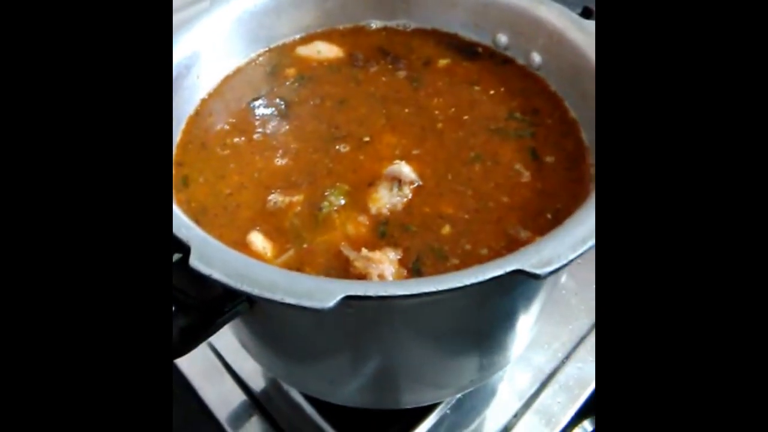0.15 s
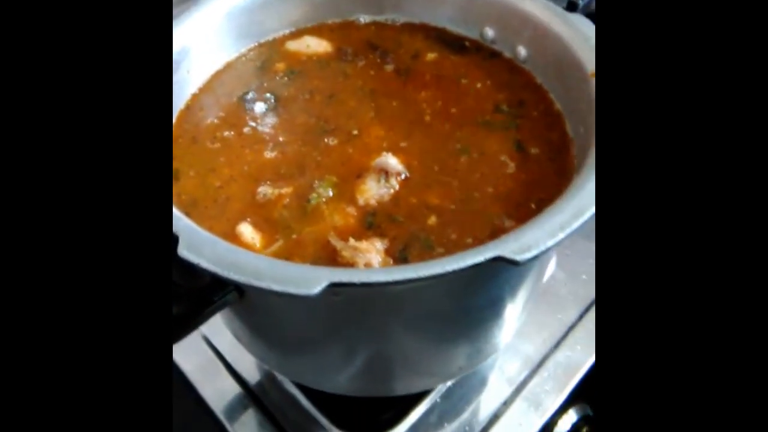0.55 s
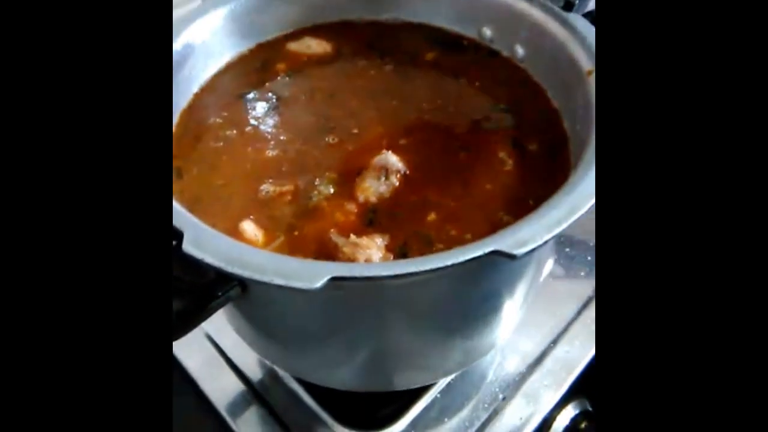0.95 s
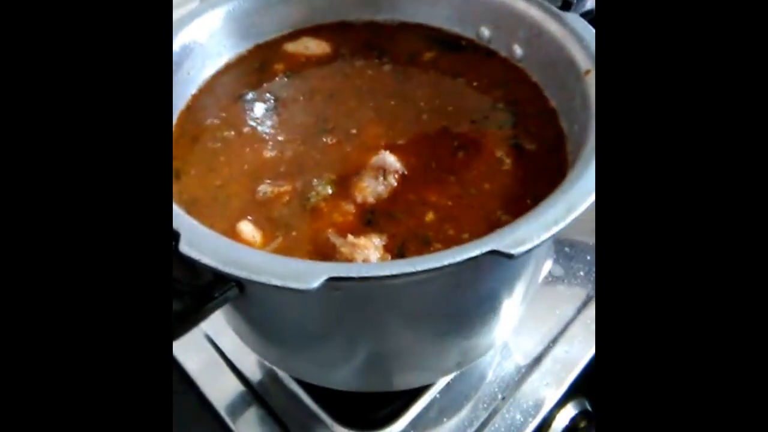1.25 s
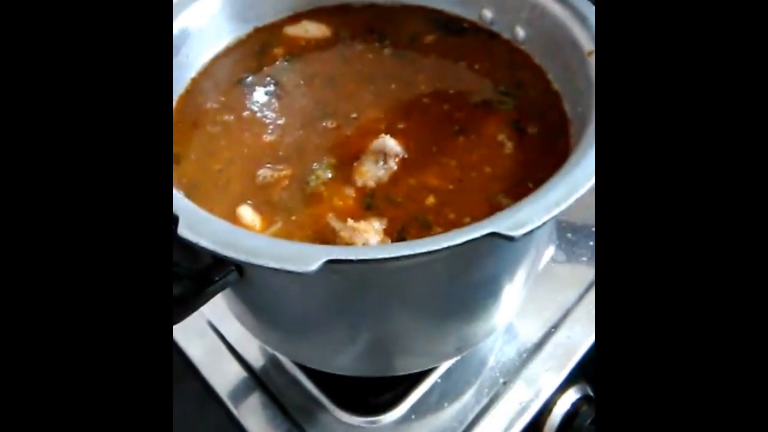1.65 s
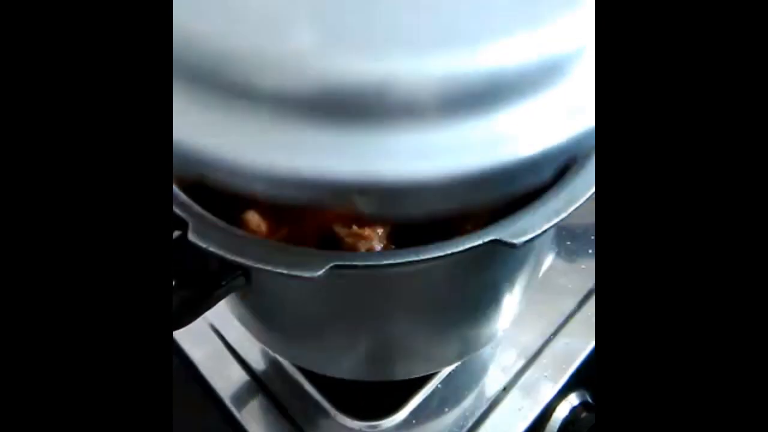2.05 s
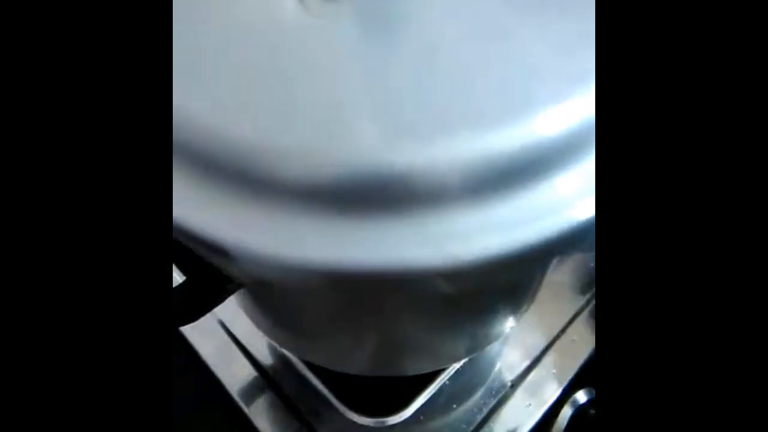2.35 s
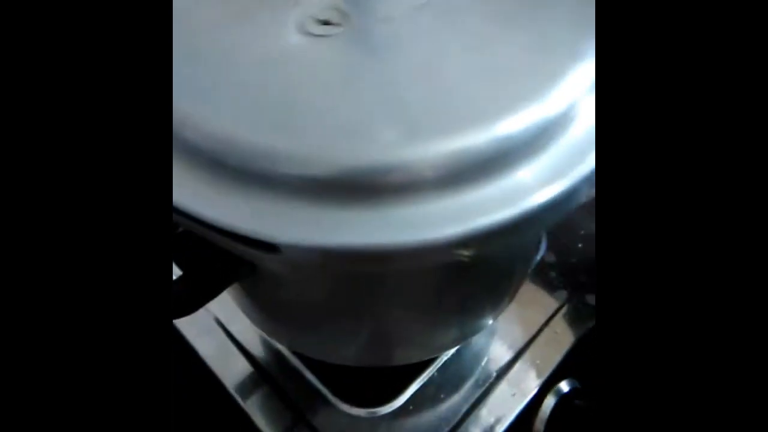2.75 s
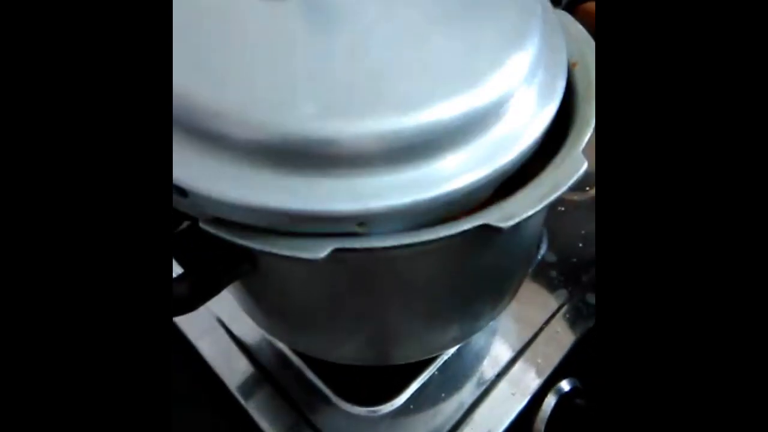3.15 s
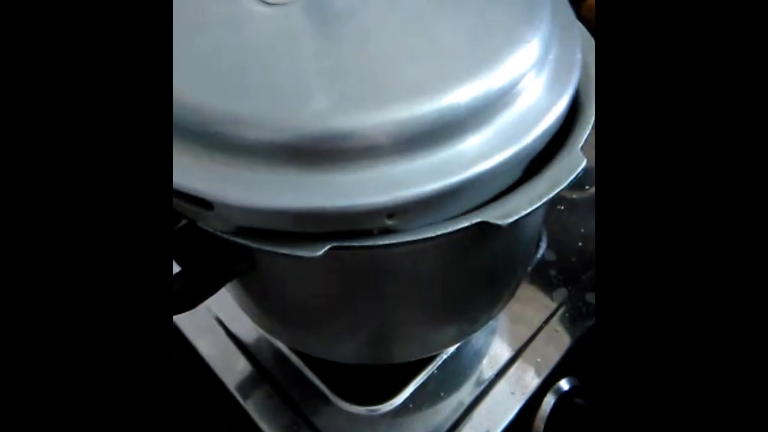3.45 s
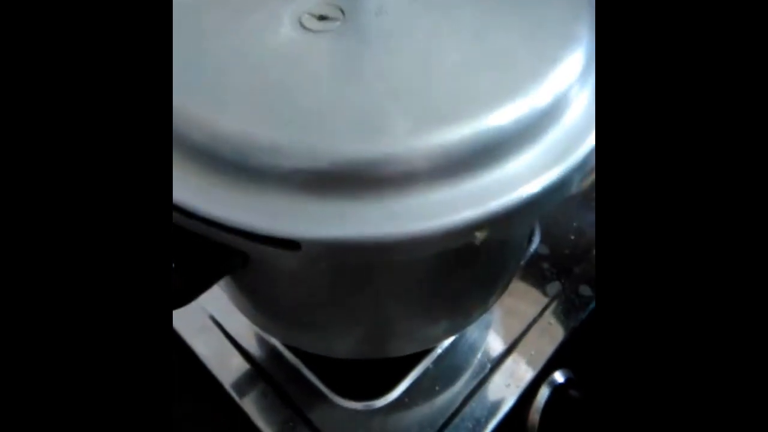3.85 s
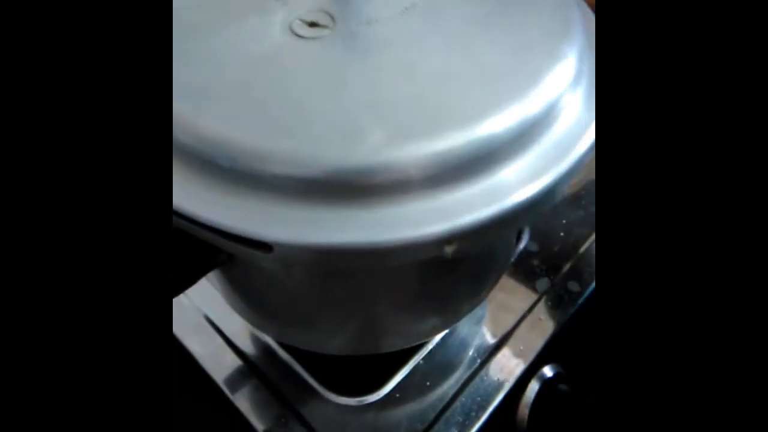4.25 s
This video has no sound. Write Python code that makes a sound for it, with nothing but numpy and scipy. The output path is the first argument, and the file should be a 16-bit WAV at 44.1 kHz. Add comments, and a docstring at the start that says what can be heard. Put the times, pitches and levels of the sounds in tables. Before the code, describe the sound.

A few distant utensil clacks, near-quiet with faint hum, then a heavy pressure cooker lid clangs, scrapes, wobbles and locks into place.

```python
"""Utensils knock a little way off in a hard-walled kitchen, over mains hum and room air, with a soft scuff
between the knocks. Faint tinks of warm metal come and go, and the hollow under a steel lid booms softly as it
comes over a pressure cooker of soup; a thin stove hiss joins in. Close by, the lid then clanks on the rim,
grinds round it, wobbles on its gasket, settles and snaps into its lugs.
Shaped noise makes the dense rings, air and hiss; sine waves make the lid's long rings and the hum."""
import sys
import numpy as np
from scipy import signal
from scipy.fft import rfft, irfft, next_fast_len
from scipy.io import wavfile
from scipy.ndimage import map_coordinates

SR = 44100
rng = np.random.default_rng(int(sys.argv[2]) if len(sys.argv) > 2 else 0)


def wav_record(signal):
    """Record a signal, one row per channel, as 16-bit PCM in the file named by sys.argv[1]."""
    frames = np.transpose(np.atleast_2d(signal))
    bounded = np.clip(frames, -1, 1)
    # unit amplitude maps onto the largest positive 16-bit level
    quanta = np.round(bounded * 32767).astype(np.int16)
    wavfile.write(sys.argv[1], SR, quanta)


N = 194201  # length in samples
RING = np.arange(3 * SR // 4) / SR  # time within one ring, s

# In the tables, t60 is the time to fall by 60 dB. Levels are relative unless marked rms.
# Bass and treble are tilts, which tilt() weights by frequency.

# the lid's edge strikes the rim: t/s, level/dB, treble/dB, pot thump/dB
LID_CONTACTS = [(2.950, -8, -4, -5.5), (3.071, -18.5, -2.5, -1.5), (3.296, -21.5, -2.5, -3),
                (3.309, -24, 3.5, -4), (3.320, -17.5, 1.5, -25), (3.402, -16, 2, -3), (3.435, -16, 4, -1),
                (3.559, -29.5, -20, 10), (3.596, -12.5, 3.5, 3.5), (3.634, -25, 18, 7.5),
                (3.717, -27.5, 7, 12), (3.757, -31, -16, -2), (3.962, -31.5, -5, 11.5),
                (4.197, -26.5, -7, 8), (4.250, -9.5, 4.5, -13), (4.385, -15, -1, -6)]
# dense crowd of modes in lid and pot: f/Hz, level/dB per Hz
SHELL_COLOUR = [(30, -48), (100, -18), (170, -17), (240, -11), (370, -10.5), (650, -5), (950, -11),
                (1800, -7.5), (2800, -18), (4300, -14.5), (5650, -18), (7500, -19.5), (10000, -15),
                (14000, -39)]
# where those modes bunch or thin out: f/Hz, width/Hz, lift/dB
MODE_CLUSTERS = [(482, 54, 6), (1187, 113, 7.5), (2024, 115, 6), (2353, 10, 14), (2450, 56, -1.5),
                 (3600, 200, 4), (3830, 107, 12), (4430, 100, 5.5), (4930, 200, 7.5), (5810, 46, 2),
                 (5720, 72, -11.5), (6130, 28, 12), (6654, 280, 12.5), (7450, 40, 13.5), (8000, 24, 16),
                 (8570, 480, 9), (9320, 160, 7), (11770, 76, 6.5), (11980, 43, 14.5)]
# single lid modes that ring out: f/Hz, level/dB, t60/s
LID_MODES = [(231.7, -2.5, 1.05), (301.7, -6, 2.25), (504.2, 2.5, 0.2), (523, -2, 0.31), (676, -13, .6),
             (740, 3, 0.32), (1134, -3, 0.38), (1170, -27, 0.41), (1793, -1, 0.56), (1960, -11, 0.36),
             (2355, -5.5, 0.2), (3670, 8.5, 0.081), (3630, -27, .45), (3880, -2, 0.22), (4170, -5, 0.51),
             (4520, -3, 0.27), (5030, -11, 0.36), (7140, -11, 0.3), (6670, -6, 0.33), (7860, -10.5, 0.95),
             (8430, -7.5, 0.3)]
# the well-damped pot's thump: f/Hz, level/dB per Hz
POT_COLOUR = [(40, -11), (100, -31), (220, -12), (400, -14.5), (510, 12.5), (620, -1), (850, -5),
              (1200, -11), (2500, -28)]
# pushes that grind the lid round on the rim: t at full force/s, held/s, level/dB, treble/dB
GRIND_PUSHES = [(3.335, 0.012, -19, 3.5), (3.443, 0.017, -12, 2.5), (3.63, 0.049, -15, 4.5),
                (4.277, 0.07, -16, 2)]
# light rubbing between pushes: t/s, held/s, level/dB
LIGHT_RUB = (3.4, 0.51, -42)
# spells when the loose lid wobbles on its gasket: from t/s, to t/s, level/dB
GASKET_WOBBLES = [(3.168, 3.25, -44.5), (3.795, 3.92, -41.5), (4.005, 4.17, -44)]
# utensils put down further off: t/s, level/dB, bass/dB, treble/dB, low f/Hz, high f/Hz, decay factor
UTENSIL_KNOCKS = [(0.000, -22, -10, -0.5, 490, 2236, 0.62), (0.035, -31.5, -14.5, -8.5, 1550, 3100, 0.91),
                  (0.296, -55, 3, -12, 520, 1185, 0.5), (0.536, -32.5, -9, -18.5, 656, 1800, 0.66),
                  (0.567, -11, 3.5, 4.5, 723, 1240, 0.77), (0.645, -27, 7.5, 3, 277, 710, 0.68),
                  (0.680, -31.5, 10.5, 9.5, 784, 4500, 0.65), (1.664, -34, -3, 9, 855, 4120, 0.6),
                  (1.705, -43, 3, 17.5, 796, 1975, 0.45)]
# shared tone of the utensils: f/Hz, level/dB per Hz
UTENSIL_COLOUR = [(50, -33.5), (150, -34), (220, -24), (290, -3.5), (390, -16.5), (600, -10.5), (800, -6),
                  (1000, -9.5), (1500, -8), (2000, -6.5), (2700, -17.5), (4300, -20), (5700, -21.5),
                  (9500, -22.5), (14000, -37.5)]
# a soft scuff: t/s, held/s, level/dB rms
SOFT_SCUFF = (1.029, 0.032, -42)
# tone of the scuff: f/Hz, level/dB per Hz
SCUFF_TONE = [(300, -46), (880, -1), (1200, -23), (1850, 5), (2200, -55), (2550, -18), (2950, 4),
              (4100, -2.5), (4650, -14), (5300, -1.5), (7000, -3), (9500, -1), (11000, -18), (14000, -25.5)]
# faint tinks of warm metal: t/s, f/Hz, level/dB
METAL_TINKS = [(0.27, 1160, -54.5), (1.241, 1162, -61), (1.576, 3195, -54.5), (1.751, 4040, -55),
               (1.88, 1296, -65.5), (2.12, 940, -59), (2.21, 1293, -66.5), (2.62, 9810, -55),
               (2.875, 2047, -63)]
# swells of the hollow under the hovering lid: t at the top/s, level/dB, half-width/s
HOLLOW_SWELLS = [(1.62, -50, 0.05), (1.80, -45.5, 0.032), (2.11, -50, 0.089), (2.31, -44, 0.17),
                 (2.72, -51.5, 0.07), (2.86, -50.5, 0.058)]
# resonances of that hollow: f/Hz, width/Hz, level/dB
HOLLOW_RESONANCES = [(179.6, 3.85, -1), (232, 14, -16.5), (687, 43, -20.5)]
# mains hum: f/Hz, level/dB rms
MAINS_HUM = [(60, -67), (120.3, -62), (181, -81.5), (241.5, -73.5), (302, -70)]
# tone of the room air: f/Hz, level/dB per Hz
AIR_COLOUR = [(25, -39.5), (42, -19), (60, -21), (100, -9.5), (144, -26.5), (180, -14.5), (250, -24.5),
              (300, -28.5), (420, -24), (560, -26), (703, -18), (830, -32.5), (1500, -34.5), (3000, -40.5),
              (9000, -43), (14000, -48)]
# decay of the kitchen, before each sound's own stretch: f/Hz, t60/s
KITCHEN_DECAY = [(100, 0.59), (300, 0.89), (1000, 0.65), (2800, 0.56), (7000, 0.47), (13000, 0.41)]
# likeness of left and right, 1 alike to -1 opposite: f/Hz, likeness
LEFT_RIGHT_LIKENESS = [(60, .6), (280, .8), (750, .5), (1150, -.1), (1900, -.5), (3000, 0), (3800, .3),
                       (5200, -.1), (6600, .5), (13000, .35)]
# left level above right, for the lid, pot and room air: f/Hz, left-right/dB
LID_LEAN = [(60, 3), (200, 6), (600, -0.5), (4000, 1.5), (6700, -1.5), (8500, 5), (13000, 4)]
# the same for the utensils, scuff, tinks and hiss: f/Hz, left-right/dB
DISTANT_LEAN = [(100, 1), (400, 0.5), (1200, 2.5), (4000, 4.5), (7000, -1), (9000, 8), (13000, 8)]
# the same for the hollow: f/Hz, left-right/dB
HOLLOW_SIDE_LEAN = [(180, 16.5), (700, -10)]

CONTACT_RISE_S, KNOCK_RISE_S = 0.003, 0.0055
FIRM_DB, BASS_PER_DB = -17, 1.62  # blows lighter than firm ring darker, harder ones thinner
BASS_LIMIT_DB = 6
PUSH_DB_PER_S, EASE_DB_PER_S = 348, 419  # how fast a push builds and lets go
RUB_FADE_DB_PER_S = 84
WOBBLE_GAP_S, WOBBLE_SCATTER_S = 0.047, 0.0069
SCUFF_RISE_DB_PER_S, SCUFF_FALL_DB_PER_S = 896, 232
TOP_HZ = 14100  # upper band limit


def clanks():
    """The lid lands, shifts and seats; the harder the blow, the thinner its ring."""
    track = np.zeros((2, N))
    for s, db, treble_db, thump_db in LID_CONTACTS:
        bass_db = min(BASS_PER_DB * (FIRM_DB - db), BASS_LIMIT_DB)
        add(track, s, amp(db) * blow(bass_db, treble_db, thump_db, CONTACT_RISE_S))
    return track


def blow(bass_db, treble_db, thump_db, rise, thump_t60=0.14, echo_db=-13):
    """A landing rings the lid and thumps the full, well-damped pot, and the room answers."""
    def pot():
        return noise(lambda hz: along(POT_COLOUR, hz), LID_LEAN, len(RING))

    direct = pot() * amp(-60 * RING / thump_t60)
    echo = amp(echo_db) * fade(pot(), stretch=0.96)
    thump = (direct + echo) * attack(rise, crack=0)
    return lid_ring(bass_db, treble_db, rise) + amp(thump_db) * thump


def lid_ring(bass_db, treble_db, rise, modes_db=-15):
    """One blow on the lid: dense shell modes in the room, and single modes at new strengths."""
    def colour(hz):
        clusters = sum(bump(hz, *cluster) for cluster in MODE_CLUSTERS)
        return along(SHELL_COLOUR, hz) + ripple(hz, 8, 85) + clusters

    def touch(hz):
        return tilt(hz, bass_db, treble_db)

    sound = fade(noise(colour, LID_LEAN, len(RING), touch), stretch=0.83)
    for hz, db, t60 in LID_MODES:
        level = amp(modes_db + db + touch(hz) + 2 * rng.standard_normal())
        # left and right are set apart in phase
        phase = 2 * np.pi * rng.random() + half_angle(hz) * np.array([[-1], [1]])
        sound = sound + level * amp(-60 * RING / t60) * np.sin(2 * np.pi * hz * RING + phase)
    return sound * attack(rise, crack=0.29)


def grinding():
    """A few firm pushes turn the lid, with light rubbing between them."""
    pushes = sum(stroke(s, held, db, PUSH_DB_PER_S, EASE_DB_PER_S) for s, held, db, _ in GRIND_PUSHES)
    rub = stroke(*LIGHT_RUB, PUSH_DB_PER_S, RUB_FADE_DB_PER_S)
    times, _, _, treble_db = np.transpose(GRIND_PUSHES)
    return scrape(pushes + rub, np.interp(np.arange(N) / SR, times, treble_db))


def scrape(force, treble_db, slip_rate=170, spread_db=4, bass_db=-5):
    """The rim sticks and slips unevenly; each slip is a tiny blow, and the ring changes as contact moves."""
    happens = rng.random(N) < slip_rate / SR  # slip_rate is the average number per second
    strength = amp(spread_db * rng.standard_normal(N))
    slips = unit(happens * strength * rng.choice([-1, 1], N)) * force
    track, step = np.zeros((2, N)), SR // 10
    first = int(LID_CONTACTS[0][0] * SR) // step * step
    # a fresh ring for every tenth of a second
    for start in range(first, N, step):
        ring = unit(lid_ring(bass_db, treble_db[start], rise=0.00015)) / np.sqrt(len(RING))
        add(track, start / SR, signal.fftconvolve(slips[None, start:start + step], ring, axes=1))
    return track


def wobbling(spread_db=2, bass_db=10, treble_db=-15, thump_db=12):
    """Dull, nearly regular bumps as the lid rocks on its gasket."""
    track = np.zeros((2, N))
    for start, end, db in GASKET_WOBBLES:
        for s in np.arange(start, end, WOBBLE_GAP_S):
            late, strong = rng.standard_normal(2)
            level = amp(db + spread_db * strong)
            sound = blow(bass_db, treble_db, thump_db, rise=0.0026)
            add(track, s + WOBBLE_SCATTER_S * late, level * sound)
    return track


def utensils(low_db=6, high_db=7):
    """Duller knocks, heard mostly through the room, each with two resonances of its own."""
    track = np.zeros((2, N))
    for s, db, bass_db, treble_db, low_hz, high_hz, stretch in UTENSIL_KNOCKS:
        def colour(hz):
            rings = bump(hz, low_hz, 100, low_db) + bump(hz, high_hz, 0.023 * high_hz, high_db)
            return along(UTENSIL_COLOUR, hz) + ripple(hz, 7.5, 90) + rings

        def touch(hz):
            return tilt(hz, bass_db, treble_db)

        tail = fade(noise(colour, DISTANT_LEAN, len(RING), touch), stretch)
        add(track, s, amp(db) * tail * attack(KNOCK_RISE_S, crack=0.26))
    return track


def handling(tink_width_hz=30, tink_stretch=0.85):
    """A short soft scuff of shaped noise, and a few faint narrow-band tinks blurred by the room."""
    scuff = noise(lambda hz: along(SCUFF_TONE, hz) + ripple(hz, 7, 130), DISTANT_LEAN, N)
    track = stroke(*SOFT_SCUFF, SCUFF_RISE_DB_PER_S, SCUFF_FALL_DB_PER_S) * scuff
    for s, pitch_hz, db in METAL_TINKS:
        def colour(hz):
            return -20 * np.log10(1 + ((hz - pitch_hz) / tink_width_hz) ** 2)

        tink = fade(noise(colour, DISTANT_LEAN, len(RING)), tink_stretch)
        add(track, s, amp(db) * tink * attack(rise=0.0017, crack=0))
    return track


def hollow(level_db=-5.0):
    """The air between lid and soup booms softly at a few resonances as the lid comes over."""
    def colour(hz):
        peaks = sum(amp(db) / (1 + ((hz - centre) / width) ** 2) for centre, width, db in HOLLOW_RESONANCES)
        return 20 * np.log10(1e-9 + peaks)

    t = np.arange(N) / SR
    swells = sum(amp(db) * np.exp(-((t - s) / width) ** 2) for s, db, width in HOLLOW_SWELLS)
    return amp(level_db) * swells * noise(colour, HOLLOW_SIDE_LEAN, N)


def stove(air_db=-61, hiss_db=-76):
    """Steady room air and mains hum, joined at 1.85 s by a thin high hiss from the burner."""
    t = np.arange(N) / SR
    hum = sum(np.sqrt(2) * amp(db) * np.sin(2 * np.pi * (hz * t + rng.random())) for hz, db in MAINS_HUM)
    jet_colour = [(9000, -35), (11000, -11), (11500, 1), (12200, -14), (13500, -25)]  # f/Hz, level/dB per Hz
    jet = noise(lambda hz: along(jet_colour, hz), DISTANT_LEAN, N)
    # t/s, level/dB on top of hiss_db
    hiss = amp(hiss_db) * curve([(1.85, -9), (2.1, 7), (2.9, 4.5)]) * jet
    air = amp(air_db) * noise(lambda hz: along(AIR_COLOUR, hz), LID_LEAN, N)
    return air + hum + hiss


def stroke(start, held, db, rise_db_per_s, fall_db_per_s):
    """Gain per sample of a movement that builds, holds and lets go."""
    t = np.arange(N) / SR - start
    build = abs(rise_db_per_s) * np.maximum(-t, 0)
    release = abs(fall_db_per_s) * np.maximum(t - held, 0)
    return amp(db - build - release)


def attack(rise, crack):
    """Contact builds over rise seconds; the direct sound stands above the tail for a moment."""
    return (1 - np.exp(-RING / max(rise, 1e-4))) * (1 + crack * np.exp(-RING / 0.014))


def tilt(hz, bass_db, treble_db):
    """Tilts a sound's bass and treble by the given dB, weighted by frequency."""
    bass = bass_db * along([(400, 0.84), (1100, 0)], hz)
    treble = treble_db * along([(900, 0.0026), (2000, 0.0), (3600, 0.88)], hz)
    return bass + treble


def bump(hz, centre_hz, width_hz, db):
    """A resonance as a hump in dB, or a dip where db is negative."""
    return db * np.exp(-((hz - centre_hz) / width_hz) ** 2)


def ripple(hz, depth_db, spacing_hz):
    """Random smooth lifts and dips in dB: some resonances are favoured and others missed."""
    knots = rng.standard_normal(1024)
    return depth_db * np.tanh(map_coordinates(knots, [hz / spacing_hz], mode="wrap"))


def fade(x, stretch):
    """Each frequency dies at the pace of the kitchen; some resonances linger and others die early."""
    hz, t, z = signal.stft(x, SR, nperseg=512)
    linger = amp(ripple(hz, 1.8, 100))
    t60 = stretch * along(KITCHEN_DECAY, hz) * linger
    return signal.istft(z * amp(-60 * t / t60[:, None]), SR, nperseg=512)[1][:, :x.shape[1]]


def noise(colour, lean, size, touch=lambda hz: 0):
    """Stereo noise scaled to a common level with a dB colour, then tilted by touch and leaned to a side."""
    hz = np.fft.rfftfreq(size, 1 / SR)
    angle = half_angle(hz)
    # a shared part and an opposite part set how alike the two sides are
    mid, side = np.exp(2j * np.pi * rng.random((2, len(hz)))) * [np.cos(angle), np.sin(angle)]
    pan = amp(along(lean, hz) / 2)
    gain = unit(amp(colour(hz))) * amp(touch(hz)) * np.sqrt(size)
    return irfft(np.array([(mid + side) * pan, (mid - side) / pan]) * gain, size)


def half_angle(hz):
    """Half the phase angle between the two microphones."""
    return np.arccos(np.clip(along(LEFT_RIGHT_LIKENESS, hz), -1, 1)) / 2


def radiated(x, corner_hz):
    """Small metal things push little air at low frequencies."""
    return signal.sosfilt(signal.butter(2, corner_hz, "highpass", fs=SR, output="sos"), x)


def amp(db):
    """Decibels to gain."""
    return np.exp(np.asarray(db) * np.log(10) / 20)


def unit(x):
    """Scaled to rms 1."""
    return x / np.sqrt(np.mean(x ** 2) + 1e-20)


def along(points, hz):
    """Points of f/Hz and value, read on a log axis."""
    f, v = np.transpose(points)
    return np.interp(np.log(hz + 1), np.log(f + 1), v)


def curve(rows):
    """Rows of t/s and level/dB as a gain per sample, near silent before the first row."""
    s, db = np.transpose(rows)
    return amp(np.interp(np.arange(N) / SR, s, db, left=-120))


def add(track, s, sound):
    """Mix a sound into the track at time s."""
    start = max(0, round(s * SR))
    track[:, start:start + sound.shape[1]] += sound[:, :N - start]


def scene():
    """Everything at the two microphones."""
    metal = clanks() + grinding() + wobbling() + utensils()
    background = handling() + hollow() + stove()
    return radiated(metal, corner_hz=55) + background


def record(dry):
    """The recorder rounds off peaks near full scale and cuts steeply above its band limit."""
    rounded = dry / (1 + dry ** 6) ** (1 / 6)
    size = next_fast_len(N + SR // 2)
    hz = np.fft.rfftfreq(size, 1 / SR)
    return irfft(rfft(rounded, size) / (1 + (hz / TOP_HZ) ** 80), size)[:, :N]


dry = scene()
out = record(dry)
wav_record(out)
```